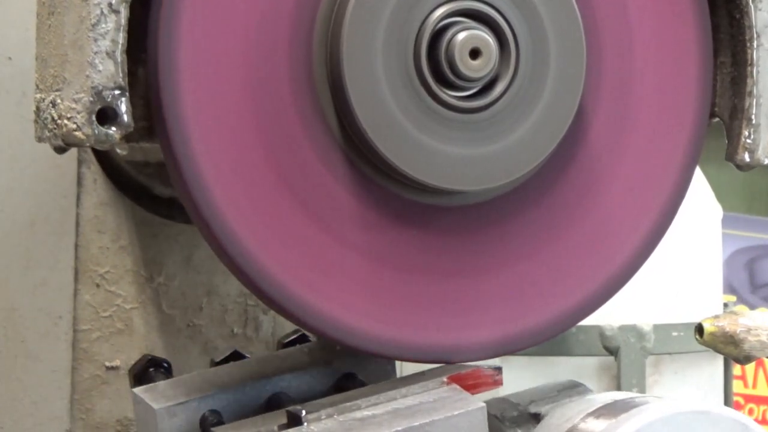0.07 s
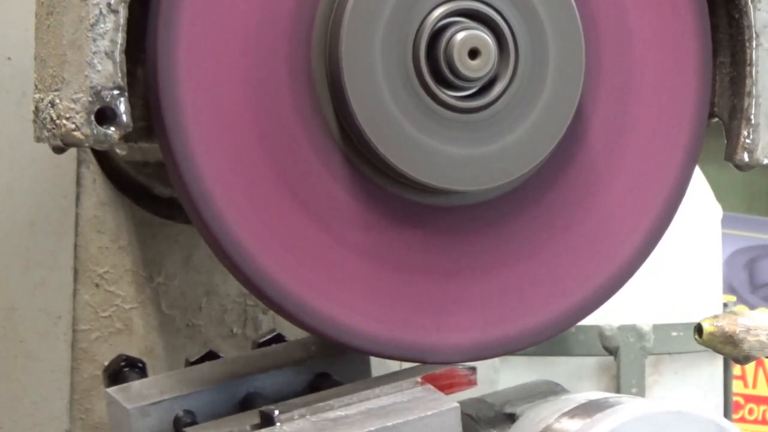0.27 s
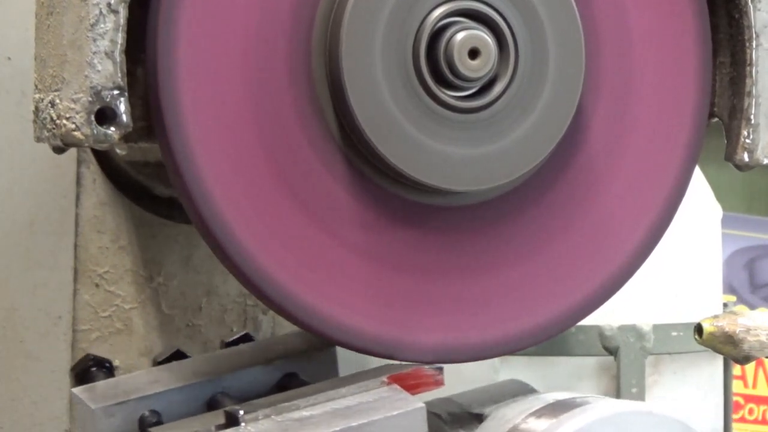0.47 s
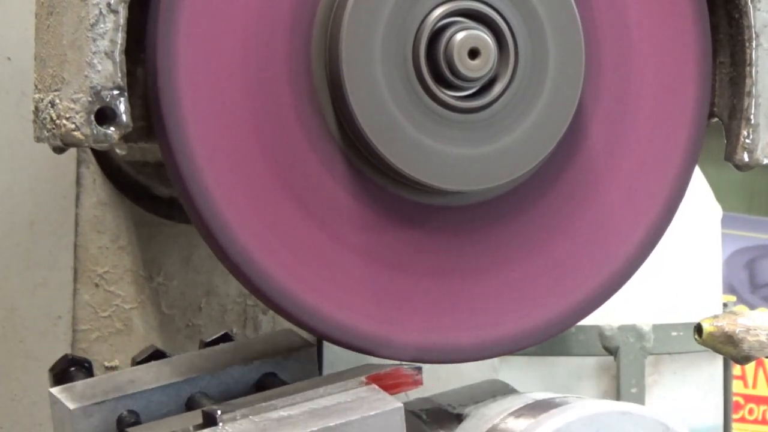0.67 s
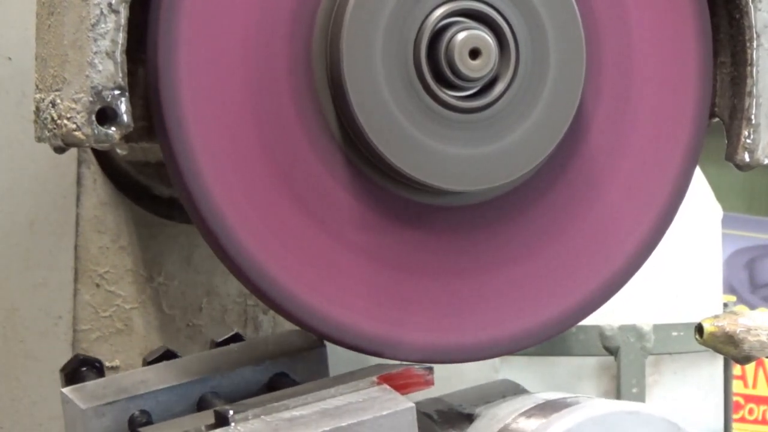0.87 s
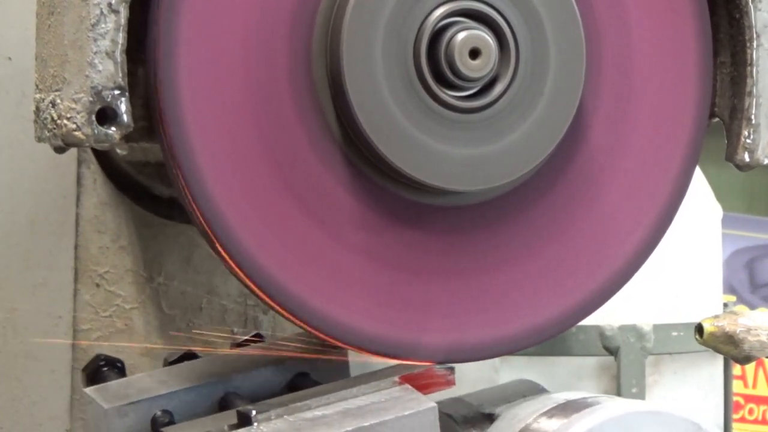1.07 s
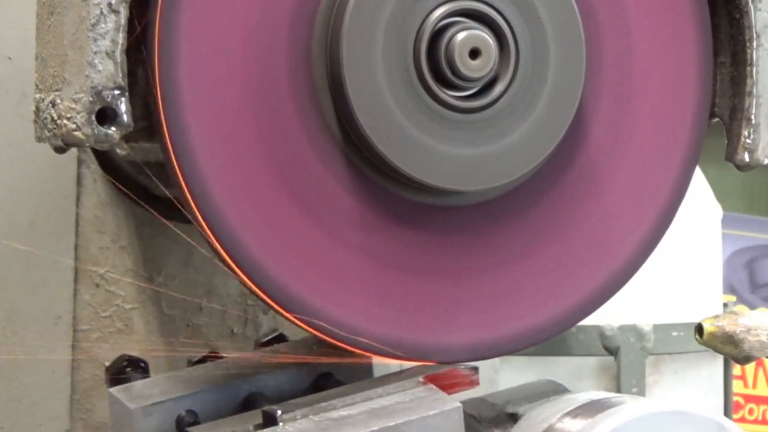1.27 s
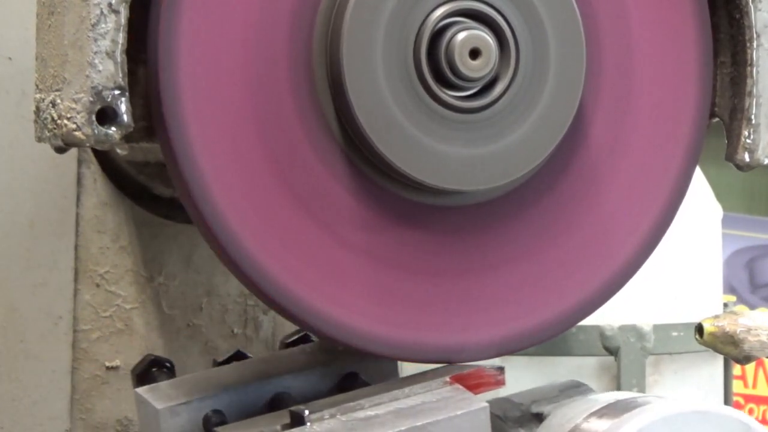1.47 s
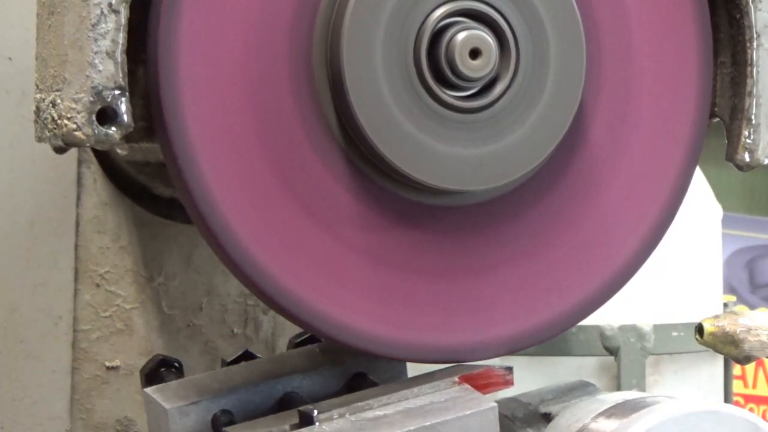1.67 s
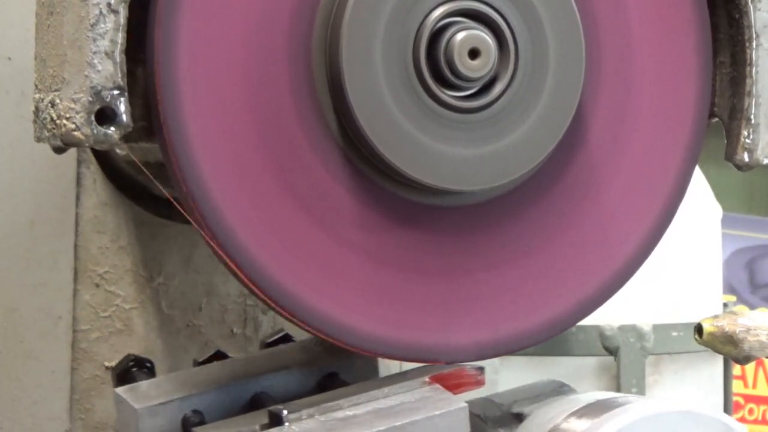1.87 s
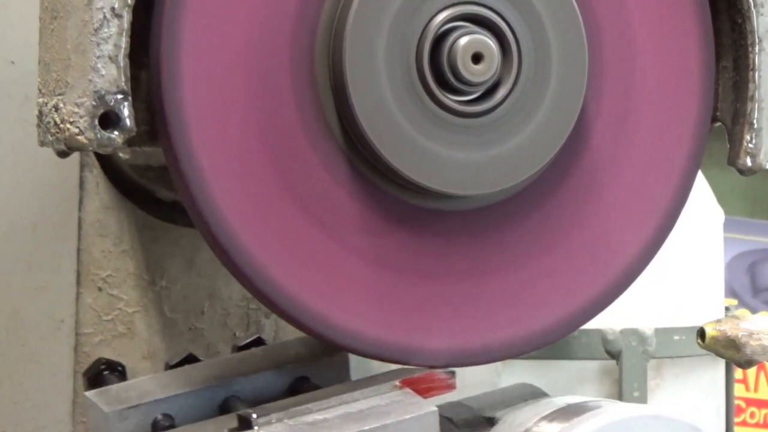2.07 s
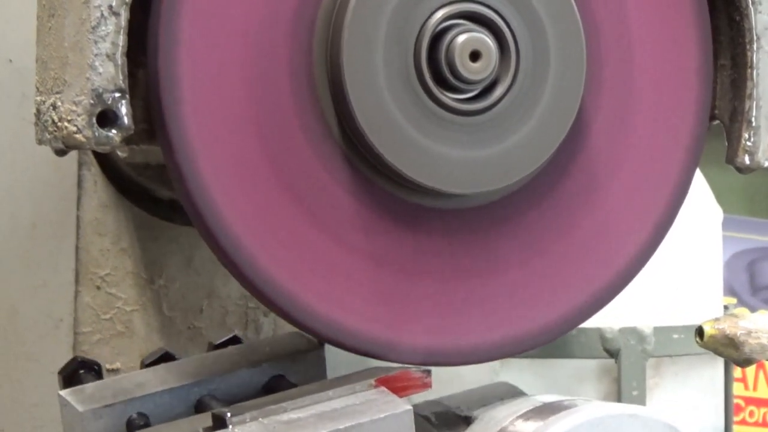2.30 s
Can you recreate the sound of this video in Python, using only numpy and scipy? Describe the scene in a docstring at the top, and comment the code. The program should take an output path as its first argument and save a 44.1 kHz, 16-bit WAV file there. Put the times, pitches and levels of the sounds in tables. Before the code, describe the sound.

A grinding wheel rasps against a steel bit over a constant airy motor whirr with wavering hum. A short, lighter buzzing scrape comes at 0.3-0.5 s, a long, harsh one at 1.0-1.5 s, and a third at 1.85-2.15 s. Each is bright, metallic and ringing, fluttering rapidly with the wheel's turns. The whirr ducks during cuts, then returns; close stereo microphone, short workshop reflections.

```python
"""A workshop: a surface grinder idles, with wavering hum lines over the broad noise of motor, bearings and air.
Three times the table carries a steel bit under the wheel. Most of the scratch repeats each turn as the same
grits come round; the wheel's high spot presses hardest, and wheel and bit ring in their modes.
The recorder's gain control ducks the whirr during each cut."""
import sys
import numpy as np
from scipy import signal
from scipy.fft import rfft, irfft, next_fast_len
from scipy.io import wavfile
from scipy.ndimage import minimum_filter1d

SR = 44100
rng = np.random.default_rng(int(sys.argv[2]) if len(sys.argv) > 2 else 0)


def gain_from_db(level_db):
    """Turn a decibel level (scalar or array-like) into a linear amplitude factor."""
    decades = np.asarray(level_db, float) / 20
    return 10 ** decades


def dump_mix(stems):
    """Bounce the given channels to the path in sys.argv[1] as a 16-bit WAV at rate SR."""
    frames = np.atleast_2d(stems).T  # one column per channel
    limited = np.clip(frames, -1, 1)  # hard clip at full scale
    pcm = np.round(limited * 32767).astype(np.int16)
    wavfile.write(sys.argv[1], SR, pcm)


N = 103061  # length in samples


def rms_one(x):
    """Scale to rms 1."""
    return x / np.sqrt(np.mean(x ** 2) + 1e-20)


def at_hz(points, hz):
    """Read a spectrum table on a log-frequency axis."""
    table_hz, table_db = np.transpose(points)
    return np.interp(np.log(hz + 1), np.log(table_hz), table_db)


def shaped(x, points):
    """Colour a signal by a spectrum table."""
    size = next_fast_len(N)
    hz = np.arange(size // 2 + 1) * SR / size
    return irfft(rfft(x, size) * gain_from_db(at_hz(points, hz)), size)[..., :N]


def one_pole(x, seconds):
    """Smooth with a time constant, starting settled."""
    r = np.exp(-1 / (seconds * SR))
    return signal.lfilter([1 - r], [1, -r], x, zi=[r * x[:2000].mean()])[0]


def drift(rate_hz):
    """Slow random wander of spread 1, made at one point per 40 samples."""
    r = np.exp(-2 * np.pi * rate_hz * 40 / SR)
    chance = rng.standard_normal(N // 40 + 2002)
    slow = signal.lfilter([1], [1, -2 * r, r * r], chance)[2000:]  # drop the filter's start
    return np.interp(np.arange(N) / 40, np.arange(len(slow)), rms_one(slow))


def resonance(x, hz, width_hz):
    """A resonance whose output keeps the power of white input."""
    r = np.exp(-np.pi * width_hz / SR)
    top = np.sqrt((1 - r * r) / 2) * np.array([1, 0, -1])
    bottom = [1, -2 * r * np.cos(2 * np.pi * hz / SR), r * r]
    return signal.lfilter(top, bottom, x + 1e-18)


def spread(mid, side, table):
    """Left and right: the coloured side signal is added to the middle in one and taken away in the other."""
    side = shaped(side, table)
    return np.array([mid + side, mid - side])


def shop(x):
    """Reflections of the room: the sound convolved with a dying noise."""
    t60_s = .18  # time for the noise to die by 60 dB
    t = np.arange(int(.3 * SR)) / SR
    tail = rng.standard_normal(len(t)) * gain_from_db(-60 * t / t60_s) * (t > .004)
    return signal.fftconvolve(x, tail / np.sqrt(np.sum(tail ** 2)))[:N]


def broad_noise():
    """Motor, bearings and air: coloured noise whose low and high parts swell separately."""
    # spectrum of the whirr: pitch_hz, relative level_db (per Hz)
    whirr_colour = [(15, -61), (25, -30.5), (107, -25.5), (204, -19.5), (267, -13), (411, -4.5),
                    (445, -10.5), (667, -11), (827, -8), (897, -12.5), (1500, -9), (2930, -16.5),
                    (4270, -15.5), (10100, -21.5), (15600, -40.5)]
    low_pass, high_pass = (signal.butter(2, 1400, kind, fs=SR, output="sos") for kind in ("low", "high"))
    low = signal.sosfilt(low_pass, rng.standard_normal(N))
    high = signal.sosfilt(high_pass, rng.standard_normal(N))
    patchy = low * gain_from_db(1.05 * drift(3.6)) + high * gain_from_db(0.28 * drift(8.2))
    return gain_from_db(-20) * rms_one(shaped(patchy, whirr_colour))


def hum_lines():
    """Steady tones of motor and spindle, each wandering in pitch and wavering in level."""
    # hum lines of motor and spindle: pitch_hz, level_db (rms, before the waver)
    hum_table = [(58.4, -56), (91, -49.5), (120, -45.5), (182, -47.5), (228, -46), (274.5, -37.5),
                 (361, -37), (388, -51), (410, -30.5), (479, -39.5), (623, -49), (806, -46), (830.5, -32.5),
                 (963, -38.5), (1045, -37), (1148, -45), (1310, -43), (1453, -40.5), (1662, -37),
                 (2030, -42.5), (2143, -43), (2492, -40.5)]
    wander, waver_db = .003, 1.8  # spread of the pitch (share of itself) and of the level
    hum = np.zeros(N)
    for pitch_hz, level_db in hum_table:
        strength = np.sqrt(2) * gain_from_db(level_db + waver_db * drift(8.9))
        start = rng.uniform(0, 7.9)
        turns = np.cumsum(pitch_hz * (1 + wander * drift(2.98))) / SR
        hum += strength * np.sin(start + 2 * np.pi * turns)
    return hum


def whirr():
    """The idling machine: broad noise plus hum lines."""
    return broad_noise() + hum_lines()


def grits(count):
    """Scratches of uneven size: noise in which some values are made much stronger."""
    spread_db = 2  # scales a random boost that averages a little under 1
    boost = np.minimum(rng.exponential(1, count), 5)
    return rms_one(rng.standard_normal(count) * gain_from_db(spread_db * boost))


def bite(turns):
    """Pressure of the high spot over one turn: it bites quickly and lets go slowly, top 1."""
    high_spot_turn, bite_turns, fade_turns = .062, .038, .15  # shares of a turn
    angle = (turns - high_spot_turn) % 1
    shape = (1 - np.exp(-angle / bite_turns)) * np.exp(-angle / fade_turns)
    return shape / shape.max()


def even_colour(x):
    """Keep the phases that time a pattern, but give every pitch the same strength."""
    return rms_one(irfft(np.exp(1j * np.angle(rfft(x)))))


def turning_wheel():
    """Read the grits around the rim as the wheel turns: whole rim, high spot, and pressure over time."""
    # wheel speed, sagging under load: time_s, turns_per_s
    speed = [(0, 58.36), (1.04, 58.35), (1.2, 57.95), (1.33, 57.95), (1.47, 58.2), (1.6, 58.36),
             (1.88, 58.3), (2.1, 58.1), (2.34, 58.35)]
    turns = np.cumsum(np.interp(np.arange(N) / SR, *np.transpose(speed))) / SR
    rim = grits(count=756)
    place = (turns % 1 * len(rim)).astype(int)
    pressure = bite(np.arange(len(rim)) / len(rim))
    spot = pressure * rim
    for _ in range(2):
        spot = even_colour(np.sqrt(pressure) * spot)
    # the rest of the rim is a quarter cycle from the spot at every pitch
    rim = irfft(rfft(spot) * rng.choice([-1j, 1j], len(rim) // 2 + 1))
    return rim[place], spot[place] * np.sqrt(np.mean(pressure ** 2)), pressure[place], np.mean(pressure ** 2)


def ringing(coarse, fine, seated, pass_number):
    """Wheel and bit ring: the scratch drives a bank of resonances."""
    # modes of wheel and bit: pitch_hz, width_hz
    modes = [(1635, 120), (1740, 45), (2088, 35), (2380, 80), (3130, 24), (3722, 32), (3770, 26),
             (4133, 28), (4860, 60), (5160, 70), (5680, 90), (5795, 90), (5885, 60), (6260, 60), (6380, 28),
             (6720, 55), (7635, 55), (8205, 32), (8370, 70), (8580, 27), (8800, 60), (9155, 30), (9245, 60),
             (9380, 50), (9750, 90), (10100, 70), (11150, 220), (11500, 150), (11680, 45), (12370, 40),
             (13600, 80), (15080, 36)]
    # relative strength of the modes: one row a pass, one column a mode in the order above, level_db
    mode_levels = [
        [-13, -17, -19, -26, -34, -6.5, -3, -13, -22, -22, -13, -29, -3.5, -25, -22, -6, -15, -9, -11, -4, -18,
         2, -16, -8, -15, -17, -7, -24, -7, -8, -30, -18],
        [-7.5, -8, -14.5, -11.5, -13, -8.5, -1, -9, -14, -7, -7.5, -20, -7, -0.5, -5.5, -8.5, -17, -22, -13,
         -5.5, -8, 1.5, -22, -3, -20, -9.5, -12, -15, -3.5, -4.5, -25, -12],
        [-4, -22, -19, -11, -27, -3.5, -1.5, -6.5, -10, -18, -14, -19, -3, -7, -4.5, -5, -8, -4, -5, -9, -3.5,
         3, -15, -0.5, -13, -10, -5.5, -7, -4.5, -1.5, -25, -11],
    ]
    out = np.zeros(len(coarse))
    for j, (pitch_hz, width_hz) in enumerate(modes):
        if pitch_hz < 6600:  # seating acts on the lower modes
            push = seated
        elif pitch_hz < 8000:
            push = coarse
        else:  # finer scratch differs more from turn to turn
            push = fine
        strength = 0.55 * gain_from_db(mode_levels[pass_number][j]) * (-1) ** j
        out += strength * resonance(push, pitch_hz, width_hz)
    return out


def cutting():
    """Grits read round and round, pressed hardest at the high spot, scratch the bit and strike the modes."""
    # each of three passes: time_s, relative force_db, depth (0-1, share of the rim that touches),
    # seating_db (how well the lower modes are driven)
    passes = [
        [(.29, -29, 0.3, 0), (.322, -27, 0.3, 2), (.328, -18, 0.3, -1), (.35, -22, 0, 0), (.37, -15, 0, -4),
         (.4, -18, 0.7, -1), (.435, -16, 0.15, -4), (.455, -18, 0.3, -3), (.47, -24.5, .1, 0),
         (.485, -41, 0.2, 0)],
        [(1.02, -50, .2, -9), (1.03, -26.5, 0.3, 2), (1.052, -15, 0.4, -19), (1.068, -11.5, 0.8, -6),
         (1.1, -11, 0.74, -3), (1.14, -12, 0.66, 1.5), (1.2, -11, 0.7, -0.5), (1.27, -12.5, .6, 0),
         (1.33, -13.5, 0.7, 0.5), (1.38, -15.5, 0.8, 2.5), (1.42, -17.5, 0.6, 3), (1.45, -12, 0.4, -13.5),
         (1.466, -27, 0.1, 21.5), (1.49, -45, 0.1, 11)],
        [(1.84, -45, 0.3, -5), (1.853, -20.5, 0.6, -7), (1.875, -18, .2, -1.5), (1.92, -18, 0.26, 0),
         (1.96, -15.5, 0.5, 1.5), (2.02, -13.5, 0.44, -1.5), (2.04, -12, 0.8, -1.5), (2.07, -13.5, 0.6, -0.5),
         (2.1, -11.5, 0.4, -6.5), (2.12, -17, 0.5, -2), (2.137, -20, 0.4, -6), (2.165, -43, 0.3, -4)],
    ]
    # dry scratch of the grits: pitch_hz, relative level_db (per Hz)
    rasp_colour = [(710, -42), (1200, -31), (1670, -2), (3470, 2), (3700, -4.5), (8000, 3), (9100, -8.5),
                   (12800, -16), (14100, -31), (15600, -1)]
    same = 0.94  # share of the scratch power that repeats every turn
    fine_wear = .9  # in a deep cut, this much of that share is lost from the finest scratch
    rim, spot, pressure, spot_power = turning_wheel()
    fresh = grits(count=N)
    out = np.zeros(N)
    for k, rows in enumerate(passes):
        time_s, force_db, depth, seating_db = np.transpose(rows)
        a, b = int(time_s[0] * SR), int(time_s[-1] * SR) + 6000  # leave room for the ringing
        t = np.arange(a, b) / SR
        deep = np.clip(np.interp(t, time_s, depth), 0, 1)
        touch = deep + (1 - deep) * pressure[a:b]
        force = gain_from_db(np.interp(t, time_s, force_db)) * (t < time_s[-1])
        force = force / np.sqrt(deep ** 2 + (1 - deep ** 2) * spot_power)  # even power at any depth
        again = deep * rim[a:b] + np.sqrt(1 - deep ** 2) * spot[a:b]
        new = touch * fresh[a:b]
        coarse = force * (np.sqrt(same) * again + np.sqrt(1 - same) * new)
        fine_same = same * (1 - fine_wear * deep)
        fine = force * (np.sqrt(fine_same) * again + np.sqrt(1 - fine_same) * new)
        seated = coarse * gain_from_db(np.interp(t, time_s, seating_db))
        out[a:b] += ringing(coarse, fine, seated, k)
        out += gain_from_db(-0.5) * shaped(np.pad(coarse, (a, N - b)), rasp_colour)
    return out


def scene():
    """Whirr and cut in the middle, with the shop's reflections around them."""
    # colour of the side reflections for whirr and cut: pitch_hz, level_db (side minus middle)
    side_whirr = [(60, -37), (110, -26), (200, -29.5), (380, -17), (700, -9.5), (1290, -7), (2380, -6),
                  (4400, -8.5), (8120, -7.5), (15000, -59)]
    side_cut = [(60, -22), (110, -29), (200, -26), (380, -19), (700, -11), (1290, -10), (2380, -7.5),
                (4400, -15.5), (8120, -9), (15000, -70)]
    # balance of the two channels: pitch_hz, level_db (left minus right)
    balance = [(60, 0), (150, 0), (380, -1.5), (700, .8), (2400, .5), (4400, -.5), (8100, .4), (12000, 0)]
    motor, cut = whirr(), cutting()
    whirr_pair = spread(motor, shop(motor), side_whirr)
    cut_middle = cut + gain_from_db(-14) * shop(cut)
    left, right = whirr_pair + spread(cut_middle, shop(cut), side_cut)
    lean = np.array(balance) * [1, .5]  # half the difference goes to each channel
    return np.array([shaped(left, lean), shaped(right, lean * [1, -1])])


def top_cut(x):
    """Nothing passes above the cut-off."""
    return signal.sosfilt(signal.butter(12, 15710, fs=SR, output="sos"), x)


def record(dry):
    """A quick gain control that holds its peak, a slowly recovering part, and a cut of the top treble."""
    knee_db, squeeze, sense_s = -18, 0.79, 0.0044  # quick part; squeeze is dB down per dB over the knee
    hold_s = .015  # most of one wheel turn
    rise_db_per_s, start_db = 2.6, 2.6  # the slow part is still recovering at the start
    slow_squeeze, slow_fall_s = 0.42, 0.25
    level_db = 10 * np.log10(one_pole(np.mean(dry ** 2, axis=0), sense_s) + 1e-12)
    hold = 2 * int(hold_s * SR / 2) + 1
    held_db = -minimum_filter1d(-level_db, hold, origin=hold // 2, mode="nearest")  # highest recent level
    over = np.maximum(one_pole(held_db, 0.0027) - knee_db, 0)
    ramp = rise_db_per_s * np.arange(N) / SR
    # the running top minus the ramp: pulled down by loud sound, then recovering at a steady rate
    top = np.maximum.accumulate(slow_squeeze * one_pole(over, slow_fall_s) + ramp)
    slow = np.maximum(top, start_db) - ramp
    extra = slow - np.minimum(slow, slow_squeeze * over)  # the slow part gives way while the quick one acts
    mix = dry * gain_from_db(-squeeze * over - extra)
    mix = signal.sosfilt(signal.cheby2(16, 40, 15380, fs=SR, output="sos"), mix)  # top cut, Hz
    return top_cut(mix)


dry = scene()
out = record(dry)
dump_mix(out)
```